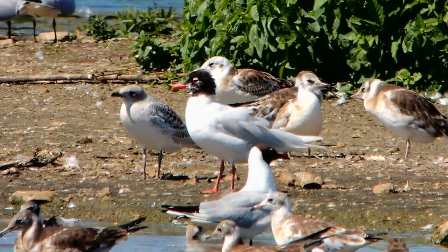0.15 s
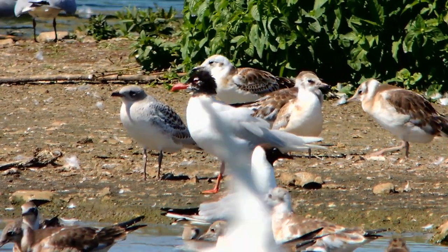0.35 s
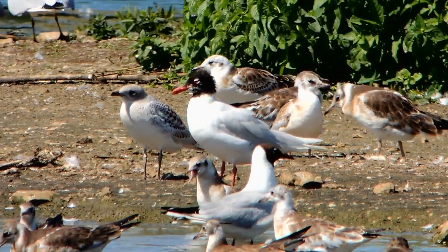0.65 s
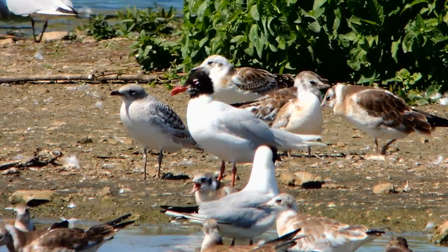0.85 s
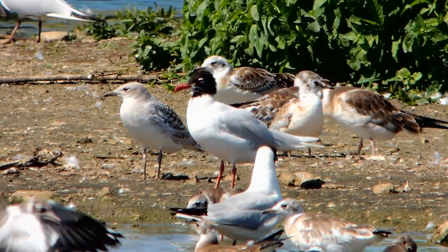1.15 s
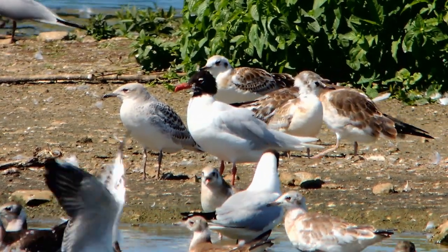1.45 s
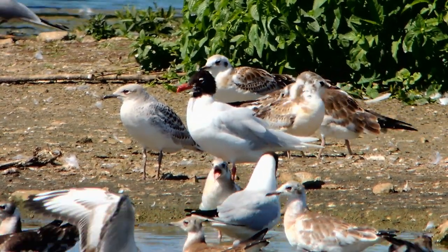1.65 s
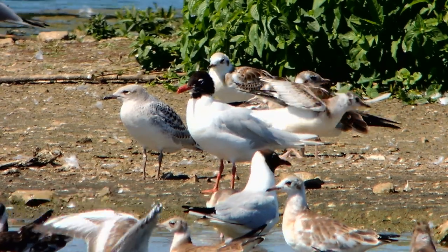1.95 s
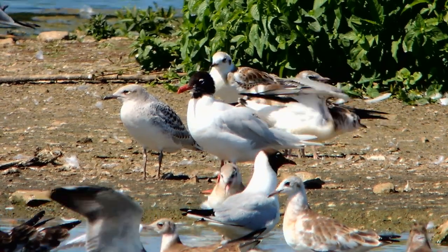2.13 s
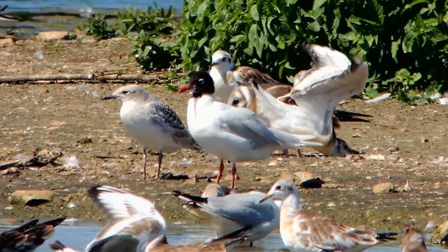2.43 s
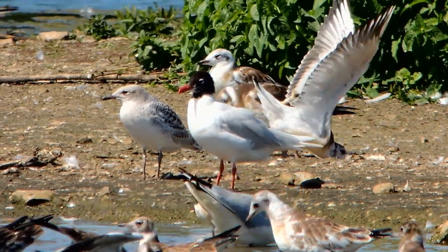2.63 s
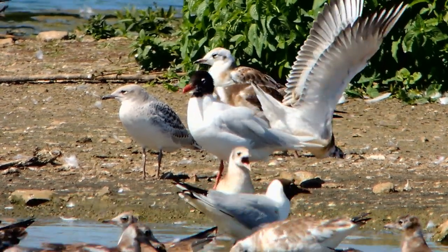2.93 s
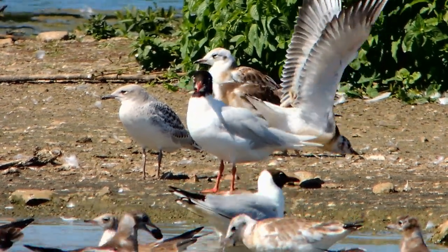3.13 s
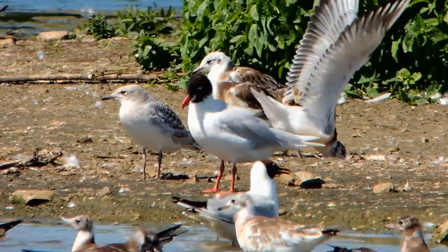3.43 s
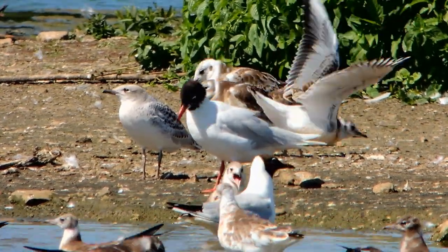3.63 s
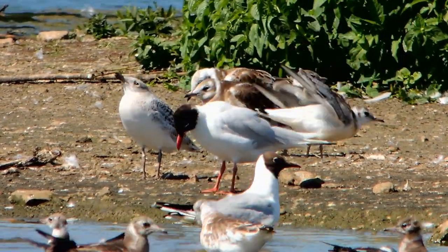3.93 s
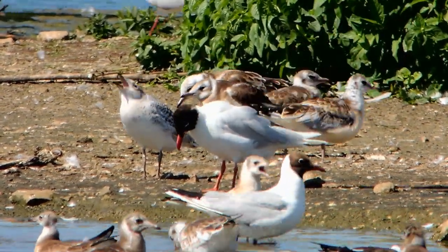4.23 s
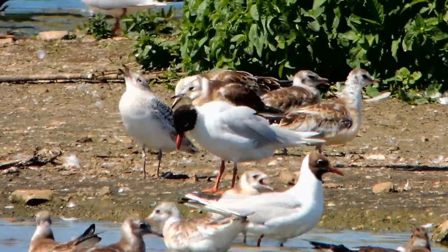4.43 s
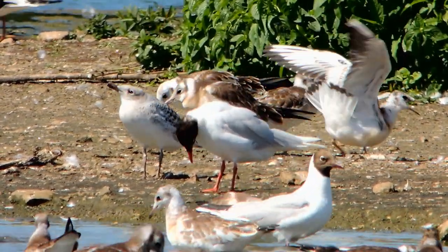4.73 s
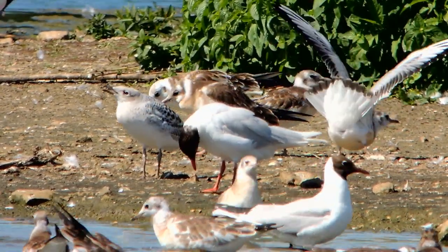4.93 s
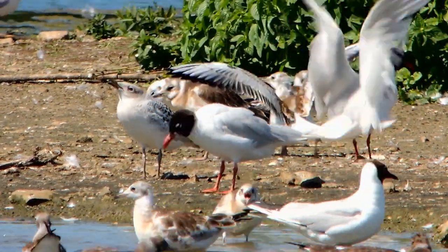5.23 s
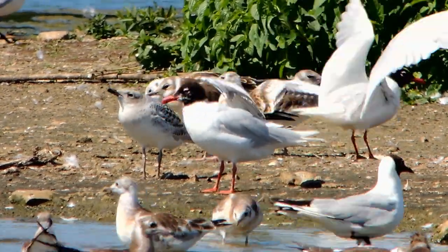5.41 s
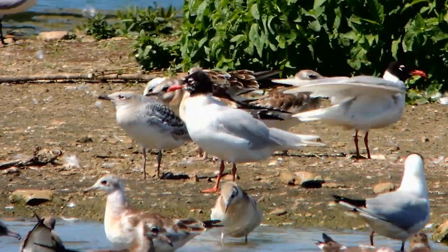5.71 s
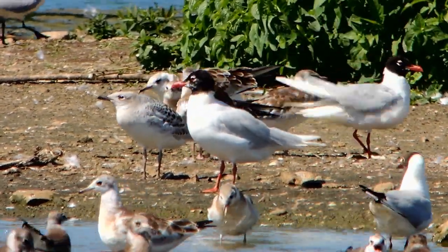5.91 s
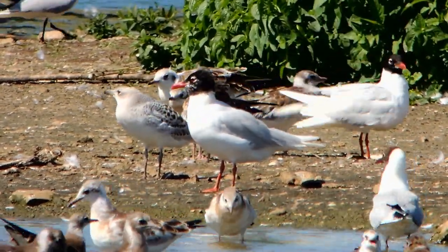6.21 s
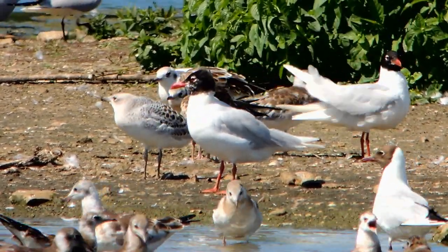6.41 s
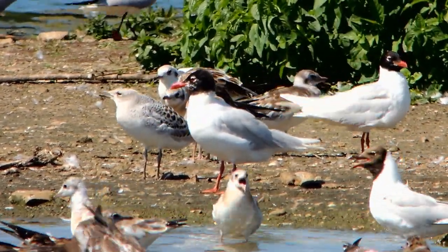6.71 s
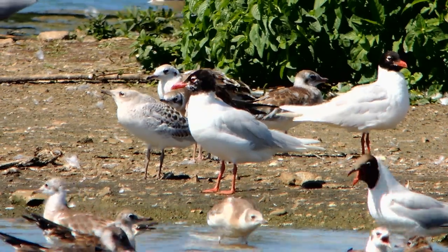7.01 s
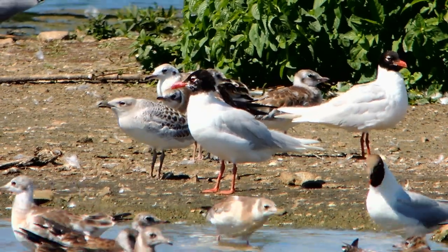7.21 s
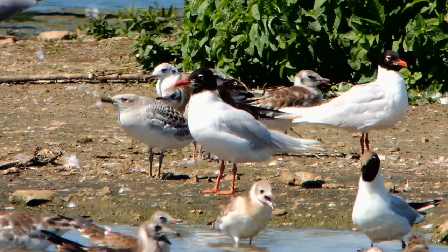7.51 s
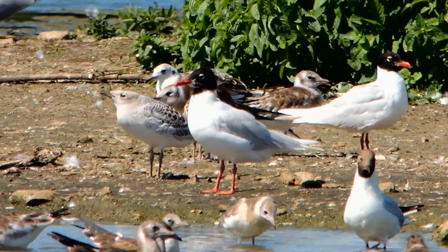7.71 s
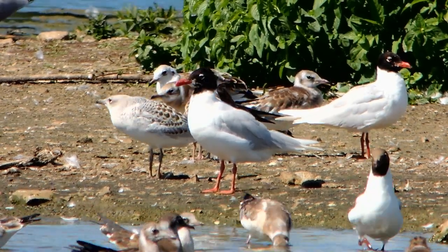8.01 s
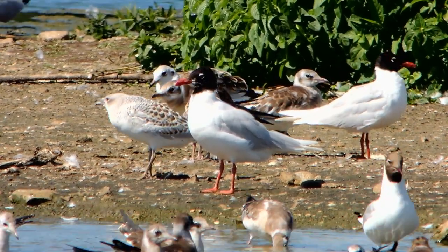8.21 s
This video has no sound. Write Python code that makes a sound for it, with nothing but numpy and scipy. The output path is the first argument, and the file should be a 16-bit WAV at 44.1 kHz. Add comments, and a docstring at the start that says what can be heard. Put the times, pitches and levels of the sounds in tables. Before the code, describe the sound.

Gulls scream hoarsely over a busy colony's din, while chicks peep and whistle shrilly close by.

```python
"""Nearby gulls scream in a shore colony: a hoarse harmonic buzz from the syrinx, chopped into throbs
by a second, slow vibration, rings throat and beak. A higher voice adds rattling screeches.
Chicks peep and whistle in near-pure tones that at times crack into rasps.
Far birds blend into a steady din over a low outdoor rumble; bank and bushes give a thin echo.
Once, something clicks sharply close by."""
import sys
import numpy as np
from scipy import signal
from scipy.fft import rfft, irfft, next_fast_len
from scipy.io import wavfile
from scipy.ndimage import map_coordinates

SR = 44100
rng = np.random.default_rng(int(sys.argv[2]) if len(sys.argv) > 2 else 0)


def output_pcm(signal):
    """Save a mono or channel-first signal as 16-bit PCM at the path in sys.argv[1].

    Samples are clipped to [-1, 1] before scaling.
    """
    pcm = np.clip(np.atleast_2d(signal).T, -1, 1) * 32767
    wavfile.write(sys.argv[1], SR, np.round(pcm).astype(np.int16))


N = 368215

# open-air rumble shape: (frequency [Hz], gain [dB])
RUMBLE_SPECTRUM = [(15, -7.5), (28, 1), (42, -4), (62, 4), (80, -7.5), (110, -6), (160, -14.5), (230, -35),
                   (400, -39)]
# rumble envelope: (time [s], relative level [dB])
RUMBLE_ENVELOPE = [(0, -47.5), (1.6, -50.5), (3.2, -51), (4.6, -47), (6.1, -47.5), (8.35, -46)]
# merged far colony: (frequency [Hz], gain [dB])
DIN_SPECTRUM = [(120, -15), (200, -5.5), (416, -7.5), (683, -4), (883, 1), (1320, -5), (1980, -1),
                (2470, -10.5), (3430, -13), (4270, -11.5), (7010, -26.5), (11500, -32), (13600, -96),
                (14900, -69), (16000, -62)]
# far gull timbre: (frequency [Hz], gain [dB])
FAR_GULL_SPECTRUM = [(500, -27), (880, -1.5), (1250, -9.5), (1600, 1.5), (2000, 8.5), (2600, -3.5),
                     (3300, 1), (4300, 1), (5500, -9), (9000, -30)]
# scattered echo decay: (frequency [Hz], T60 [s])
ECHO_T60 = [(300, 0.27), (2000, 0.28), (10000, 0.064)]
# stereo side filter: (frequency [Hz], gain [dB])
SIDE_GAIN = [(25, -13), (100, -17.5), (250, -12), (600, -17), (2000, -19.5), (4500, -10.5), (7000, -4),
             (9500, -1), (12000, -0.5)]
# gliding notes: (start [s], end [s], first [Hz], middle [Hz], last [Hz], relative level [dB])
SLUR_NOTES = [(0.254, 0.373, 4330, 4480, 4410, -56), (0.271, 0.438, 4120, 4150, 3820, -53),
              (1.026, 1.272, 3140, 3510, 4270, -57), (1.065, 1.22, 4450, 4380, 4420, -57),
              (1.156, 1.506, 2124, 2062, 1942, -54.5), (1.458, 1.49, 2950, 2850, 2600, -43.5),
              (1.71, 1.837, 4330, 4700, 4660, -63), (1.818, 1.856, 4300, 4690, 4800, -56),
              (2.257, 2.637, 2095, 1964, 1830, -64), (2.28, 2.365, 4000, 3880, 3600, -65),
              (2.364, 2.41, 3160, 3450, 3950, -58), (2.407, 2.504, 5420, 5800, 6500, -61),
              (2.508, 2.637, 4800, 4900, 4860, -55), (2.623, 2.744, 4430, 4520, 4530, -54.5),
              (2.76, 2.954, 4550, 4560, 4530, -51), (2.76, 2.9, 3100, 3580, 3980, -68),
              (4.225, 4.28, 3120, 3110, 2960, -57), (4.843, 4.94, 4000, 4180, 4290, -59),
              (5.226, 5.29, 3560, 3620, 3500, -56), (5.29, 5.397, 4670, 4710, 4450, -54),
              (5.456, 5.586, 3570, 4130, 4500, -55), (5.666, 5.758, 3900, 4190, 4370, -61),
              (5.8, 5.964, 4200, 3850, 3540, -64), (6.333, 6.498, 3880, 4190, 3800, -63),
              (6.314, 6.458, 4320, 4940, 4500, -54.5), (6.469, 6.616, 4640, 4510, 4590, -54.5),
              (6.502, 6.537, 3590, 3800, 3920, -51), (6.562, 6.683, 3990, 3616, 3540, -48),
              (6.848, 6.89, 3500, 3720, 4370, -52.5), (7.307, 7.368, 3600, 4120, 4150, -53),
              (7.408, 7.457, 3950, 3800, 3750, -51), (7.502, 7.52, 3120, 3250, 3500, -49),
              (7.556, 7.717, 5000, 4200, 3950, -56), (7.942, 8.098, 4360, 4550, 4700, -54.5)]
# begging whistles: (start [s], end [s], level [dB], catch length [s])
WHISTLE_CALLS = [(1.818, 1.993, -49, 0.12), (5.08, 5.32, -52, 0.084), (5.74, 6.03, -52, 0.14)]
# closest chick's held notes: (start [s], end [s], pitch [Hz], level [dB])
HELD_NOTES = [(1.197, 1.353, 4270, -43), (1.353, 1.407, 4330, -42), (1.414, 1.496, 4190, -40.5),
              (2.434, 2.635, 4310, -51.5), (3.669, 3.974, 4264, -47.5)]
# presses on those notes: (middle [s], length [s], pitch [Hz], level [dB], roughness [ratio])
PRESSES = [(1.234, 0.046, 4120, -34, 0.0095), (1.279, .03, 4410, -40, 0.019),
           (1.31, .026, 4000, -35, 0.013), (1.327, 0.016, 4140, -35, .008),
           (1.387, 0.031, 4030, -36.5, 0.051), (1.479, 0.054, 3860, -41, 0.035),
           (2.49, .035, 4120, -43, .018), (2.617, .04, 3900, -49, .018), (3.69, .035, 4060, -43.5, 0.0099),
           (3.785, .036, 4090, -37.5, .009), (3.864, 0.025, 3760, -38, 0.016),
           (3.936, .03, 3980, -43.5, 0.025), (3.962, 0.03, 3600, -45, 0.025)]
# chick rasps: (start [s], end [s], pitch [Hz], level [dB])
CRACK_CALLS = [(1.374, 1.413, 1345, -49), (1.452, 1.488, 970, -49.5), (2.544, 2.579, 1045, -46),
               (3.842, 3.888, 1000, -50), (3.926, 3.966, 950, -48)]
# higher voice: (start [s], end [s], pitch [Hz], rattle [Hz], hoarseness [0-1], level [dB])
SCREECH_CALLS = [(1.56, 1.72, 1080, 61.5, .45, -52), (2.93, 3.13, 1012, 60.9, .28, -46.5),
                 (3.346, 3.559, 1085, 65.5, .68, -37.5)]
# screech timbre: (frequency [Hz], gain [dB])
SCREECH_SPECTRUM = [(1200, -30), (2100, -4), (2700, 1.5), (3250, -1), (4250, 2), (5400, -4), (6600, -6.5),
                    (7400, -24), (10300, -21), (13000, -30), (16000, -45)]
# near gull throat: (frequency [Hz], gain [dB])
THROAT_SPECTRUM = [(600, -41), (1150, -53), (1500, 11), (1850, 13), (2080, 7.5), (2400, 7), (2750, 1.5),
                   (3300, -21), (5000, -62)]
# high overtones of screams and cracks: (frequency [Hz], gain [dB])
EDGE_SPECTRUM = [(3500, -56), (5200, 4), (6400, 4), (7400, 0.5), (8500, -2.5), (10500, -2.5), (13000, -8),
                 (16000, -30)]
# near gulls: (start [s], end [s], pitch [Hz], throb [Hz], strain [0-1], arch [ratio], fall [ratio],
# beak resonance [Hz], upper ring [Hz], relative throat [dB], relative nasal cry [dB], relative beak [dB])
SCREAM_CALLS = [(0.086, 0.305, 708, 93, 0.59, 0.11, -0.031, 4400, 7000, -50.5, -58, -59),
                (0.361, 0.767, 648, 63.4, 0.64, 0.12, 0.037, 4000, 5540, -50, -50, -50.5),
                (0.728, 1.119, 674, 45.6, 0.37, 0.1, .06, 4520, 5700, -52.5, -49.5, -53.5),
                (1.749, 2.008, 679, 95.3, 0.53, 0.096, -0.012, 4450, 6960, -56, -46.5, -66),
                (1.887, 2.263, 701.4, 52.7, 0.74, .08, 0.0056, 4430, 8700, -49.5, -62, -48),
                (2.591, 2.846, 702, 113.2, .58, 0.1, 0.019, 4230, 7300, -60, -45.5, -55),
                (3.068, 3.33, 665, 48.7, 0.94, 0.16, 0.022, 4250, 5700, -49.5, -50, -49),
                (3.567, 3.862, 693.5, 90, 0.73, 0.059, 0.0017, 4650, 7900, -55.5, -50, -57.5),
                (3.768, 4.038, 670, 50.2, 0.74, 0.099, 0.049, 4350, 5550, -49, -58, -52),
                (4.433, 4.704, 652.4, 55.6, 0.9, .15, 0, 4430, 7900, -48, -59, -50.5),
                (4.667, 4.897, 708, 126.7, 0.76, 0.14, 0.032, 4760, 7760, -52, -45.5, -55.5),
                (5.288, 5.551, 647, 49.4, 0.49, 0.11, 0.022, 4450, 6800, -57, -50.5, -56),
                (5.568, 5.827, 679, 120.7, 0.51, .14, 0.034, 4850, 7240, -52, -50.5, -56),
                (5.879, 6.159, 649, 60.7, 0.66, .08, 0.022, 4800, 5600, -54.5, -55.5, -63),
                (6.18, 6.355, 644, 90, 0, 0.093, .03, 3780, 5600, -53.5, -54, -66),
                (6.603, 6.813, 652, 79.7, .62, 0.037, 0.0056, 4500, 7500, -53.5, -51, -55),
                (6.847, 7.07, 665, 86, 0.67, 0.076, 0.0078, 4500, 5900, -58, -63, -51.5),
                (7.159, 7.497, 660, 104.1, .77, 0.092, 0.056, 4500, 7100, -57.5, -48, -51.5),
                (7.357, 7.72, 666, 70.1, 0.68, 0.13, 0.077, 4630, 6500, -56, -59, -50),
                (7.959, 8.129, 739, 110.5, .64, 0.063, 0.09, 4300, 7000, -75, -45.5, -52.5),
                (8.037, 8.374, 615.4, 86.3, 0.69, 0.077, 0.036, 4240, 6650, -54, -59, -47.5)]


def amp(db):
    return 10 ** (np.asarray(db) / 20)


def unit(x):
    return x / np.sqrt(np.mean(x ** 2) + 1e-20)


def along(points, hz):
    """Interpolate (Hz, value) points on a log axis."""
    knots_hz, values = np.transpose(points)
    return np.interp(np.log(hz + 1), np.log(knots_hz + 1), values)


def wobble(n, rate_hz):
    """Smooth random curve, rate_hz knots a second."""
    knots = rng.standard_normal(int(n * rate_hz / SR) + 4)
    return map_coordinates(knots, [np.arange(n) * rate_hz / SR])


def filtered(x, response):
    """Apply response(hz) by FFT."""
    n = x.shape[-1]
    size = next_fast_len(n + 2048)
    return irfft(rfft(x, size) * response(np.fft.rfftfreq(size, 1 / SR)), size)[..., :n]


def coloured(x, spectrum):
    """Filter by a (Hz, dB) table; rms 1."""
    return unit(filtered(x, lambda hz: amp(along(spectrum, hz))))


def formant(x, centre_hz, width_hz):
    """Steep-sided resonance; rms 1."""
    return unit(filtered(x, lambda hz: (1 + ((hz - centre_hz) / width_hz) ** 2 / 2) ** -2))


def sweep(x, centre_hz, width_hz):
    """Moving resonance: shift to 0 Hz, low-pass, shift back; rms 1."""
    carrier = np.exp(2j * np.pi * np.cumsum(centre_hz) / SR)
    base = x / carrier
    re, im = filtered(np.array([base.real, base.imag]), lambda hz: (1 + (hz / width_hz) ** 2 / 2) ** -2)
    return unit(((re + 1j * im) * carrier).real)


def fade(n, ramp_s):
    """Gate with soft ends."""
    t = np.arange(n) / SR
    return np.sin(np.pi / 2 * np.clip(np.minimum(t, t[-1] - t) / ramp_s, 0, 1))


def add(track, start_s, sound):
    """Mix in at start_s, cropped to the track."""
    i = round(start_s * SR)
    part = sound[max(-i, 0):max(N - i, 0)]
    track[max(i, 0):max(i, 0) + len(part)] += part


def course(length_s):
    """Progress u through a call, -1 to 1."""
    return np.linspace(-1, 1, max(int(length_s * SR), SR // 50))


def bend(u, arch, fall):
    """Relative pitch change: arch, fall and slight wander."""
    return arch * (1 / 3 - u ** 2) - fall * u + 0.00911 * wobble(len(u), 29.96)


def syrinx(pitch_hz, throb_hz, depth, hoarse):
    """Harmonic buzz; a second, slow vibration chops it into throbs and swings its pitch."""
    n = len(pitch_hz)
    beat = 2 * np.pi * np.cumsum(throb_hz * (1 + 0.059 * wobble(n, 45.4))) / SR
    jitter = 0.038 * hoarse * wobble(n, 600)
    hz = pitch_hz * (1 + 0.029 * depth * np.cos(beat) + jitter)
    phase = 2 * np.pi * np.cumsum(hz) / SR
    buzz = unit(np.sin(17.5 * phase) / np.sin(phase / 2) - 1)  # 17 equal harmonics
    # hoarseness: uneven pulses, each with a puff of air
    buzz *= 1 + 0.71 * hoarse * wobble(n, pitch_hz.mean())
    air = 0.9 * hoarse * rng.standard_normal(n) * (1 + np.cos(phase))
    throb = np.abs(np.cos(beat / 2)) ** 0.89
    return (buzz + air) * (1 - np.clip(depth, 0, 1) * (1 - throb))


def smeared(x):
    """Highs lag lows, 3.5 ms at 6 kHz, softening each voice pulse."""
    return filtered(x, lambda hz: np.exp(-1j * np.pi * 0.0035 * hz ** 2 / 6000))


def chick_note(hz, rough, overtone_db, octave_db):
    """The beak picks out the third harmonic, at hz; roughness shakes pitch and level."""
    n = len(hz)
    shake = rough * wobble(n, 376.5)
    phase = 2 * np.pi * np.cumsum(hz * (1 + shake + 0.00505 * wobble(n, 45.15))) / SR
    overtones = np.sin(4 / 3 * phase) + 0.12 * np.sin(5 / 3 * phase) + 0.08 * np.sin(3 * phase)
    tone = np.sin(phase) + amp(overtone_db) * overtones + amp(octave_db) * np.sin(2 * phase)
    return unit(tone * amp(157 * rough * wobble(n, 219)))


def slur(length_s, first_hz, middle_hz, last_hz, swell_db=2.5):
    """One note gliding through three pitches, loudest midway."""
    u = course(length_s)
    hz = np.polyval(np.polyfit([-1, 0, 1], [first_hz, middle_hz, last_hz], 2), u)
    note = chick_note(hz, rough=0.005, overtone_db=-36, octave_db=-23)
    return note * amp(swell_db * (1 / 2 - u ** 2)) * fade(len(u), 0.0052)


def echo(x):
    """Scatter from bank and bushes: a noise tail whose treble dies first."""
    hz, t, noise = signal.stft(rng.standard_normal(SR // 2), SR, nperseg=256)
    decay = amp(-60 * t / along(ECHO_T60, hz)[:, None])
    tail = signal.istft(noise * decay, SR, nperseg=256)[1]
    return signal.fftconvolve(x, tail / np.linalg.norm(tail))[:N]


def din(fall_db_per_s=0.26):
    """The farthest voices merge into a slowly settling roar over open-air rumble."""
    t = np.arange(N) / SR
    roar_db = -44 - fall_db_per_s * t + 0.071 * wobble(N, 18)
    roar = amp(roar_db) * coloured(rng.standard_normal(N), DIN_SPECTRUM)
    rumble_db = np.interp(t, *np.transpose(RUMBLE_ENVELOPE))
    return roar + amp(rumble_db) * coloured(rng.standard_normal(N), RUMBLE_SPECTRUM)


def far_birds(count=44):
    """Distant gulls scream at random, with two gliding chick notes per scream."""
    adults, young = np.zeros(N), np.zeros(N)
    starts_s = (np.arange(count) + rng.random(count)) / count * (N / SR + 0.3) - 0.3
    for start_s, (length, pitch, throb, size) in zip(starts_s, rng.uniform(-1, 1, (count, 4))):
        drift = bend(course(0.38 + 0.14 * length), arch=0.14, fall=0.04)
        call = syrinx((780 + 220 * pitch) * (1 + drift), 85 + 35 * throb, depth=0.46, hoarse=0.498)
        add(adults, start_s, amp(3 * size) * call * fade(len(call), 0.14))
        for delay, span, height, arch, direction, loudness in rng.uniform(-1, 1, (2, 6)):
            hz = 4500 - 280 * (height + 1) ** 2  # most near the top of the range
            glide_hz = 330 * np.sign(direction)
            note = slur(0.13 + 0.085 * span, hz - glide_hz, hz + 200 * abs(arch), hz + glide_hz)
            add(young, start_s + delay / 10, amp(2 * loudness) * (hz / 4000) * note)
    return amp(-56.5) * coloured(adults, FAR_GULL_SPECTRUM) + amp(-63.5) * unit(young)


def click(start_s=6.9887):
    """Hard tick and short knock, then a fizz that differs left and right."""
    t = np.arange(SR // 8) / SR
    knock = amp(-19) * np.sin(2 * np.pi * 1550 * t) * amp(-60 * t / 0.008)
    tick = amp(-28) * formant(rng.standard_normal(len(t)), 10000, 6000) * amp(-60 * t / 0.003)
    decay = amp(-60 * t / 0.059) + amp(-18 - 60 * t / 0.32)
    fizz_mid = amp(-32) * decay * formant(rng.standard_normal(len(t)), 10500, 4400)
    fizz_side = amp(-30) * decay * formant(rng.standard_normal(len(t)), 10500, 4400)
    out = np.zeros((2, N))
    add(out[0], start_s, knock + tick + fizz_mid + fizz_side)
    add(out[1], start_s, knock + tick + amp(1) * (fizz_mid - fizz_side))
    return out


def slurs():
    """Short gliding chick notes and a few lower cries."""
    out = np.zeros(N)
    for start_s, end_s, *pitches_hz, db in SLUR_NOTES:
        add(out, start_s, amp(db + 1.5) * slur(end_s - start_s, *pitches_hz))
    return out


def whistles(top_hz=4980, arch_hz=542, catch_hz=4610, catch_db=1, catch_after_s=0.04, jump_s=0.0055):
    """Arched begging whistles; each catches on a flat, louder note, then jumps back."""
    out = np.zeros(N)
    for start_s, end_s, db, catch_s in WHISTLE_CALLS:
        t = np.arange(0, end_s - start_s, 1 / SR) - catch_after_s
        free_hz = top_hz - arch_hz * np.linspace(-1, 1, len(t)) ** 2
        caught = np.clip(np.minimum(t, catch_s - t) / jump_s, 0, 1)
        hz = free_hz + caught * (catch_hz - free_hz)
        note = chick_note(hz, rough=0.0046, overtone_db=-30, octave_db=-30)
        add(out, start_s, amp(db + catch_db * caught) * note * fade(len(t), 0.015))
    return out


def peeps(held_rough=0.012):
    """The closest chick holds a thin note; each press shifts its pitch, level and roughness."""
    out = np.zeros(N)
    for start_s, end_s, hz, db in HELD_NOTES:
        t = np.arange(start_s, end_s, 1 / SR)
        rough = held_rough
        for middle_s, length_s, press_hz, press_db, press_rough in PRESSES:
            press = np.exp(-np.abs(2 * (t - middle_s) / length_s) ** 3)
            hz += press * (press_hz - hz)
            db += press * (press_db - db)
            rough += press * (press_rough - rough)
        note = chick_note(hz, rough, overtone_db=-19, octave_db=-26)
        add(out, start_s, amp(db) * note * fade(len(t), 0.004))
    return out


def cracks():
    """A chick's voice breaks into short, falling rasps."""
    out = np.zeros(N)
    for start_s, end_s, pitch_hz, db in CRACK_CALLS:
        drift = bend(course(end_s - start_s), arch=0, fall=0.0475)
        source = syrinx(pitch_hz * (1 + drift), throb_hz=110, depth=0.67, hoarse=0.52)
        crack = formant(source, 4100, 1040) + amp(-7.5) * coloured(source, EDGE_SPECTRUM)
        add(out, start_s, amp(db) * crack * fade(len(crack), 0.003))
    return out


def screeches(scoop_s=0.02, swell_db=10):
    """A higher voice scoops up to pitch and swells, cut into a hard rattle."""
    out = np.zeros(N)
    for start_s, end_s, pitch_hz, rattle_hz, hoarse, db in SCREECH_CALLS:
        u = course(end_s - start_s)
        scoop = 0.3 * np.exp(-np.arange(len(u)) / SR / scoop_s)
        hz = pitch_hz * (1 + bend(u, arch=0.025, fall=0.01) - scoop)
        source = smeared(syrinx(hz, rattle_hz, depth=0.88, hoarse=hoarse))
        voice = coloured(source, SCREECH_SPECTRUM)
        add(out, start_s, amp(db - swell_db * u ** 2) * voice * fade(len(u), 0.02))
    return out


def windpipe(x, spacing_hz):
    """Reflections along the windpipe ring at evenly spaced frequencies."""
    return filtered(x, lambda hz: 1 / (1 - 0.35 * np.exp(-2j * np.pi * hz / spacing_hz)))


def screams(throat_swell_db=5.5, beak_swell_db=9, edge_swell_db=11):
    """Near gulls: the syrinx rings throat and beak; resonances ride the pitch; mid-call is brightest."""
    out = np.zeros(N)
    for (start_s, end_s, pitch_hz, throb_hz, strain, arch, fall,
         beak_hz, ring_hz, throat_db, cry_db, beak_db) in SCREAM_CALLS:
        u = course(end_s - start_s)
        effort = 1 / 4 - u ** 2
        drift = bend(u, arch, fall)
        hz = pitch_hz * (1 + drift)
        gape = 1 + 0.57 * drift  # beak resonances partly follow the pitch
        hoarse = 0.42 + 0.16 * strain
        edge_db = -82.5 + 30 * strain
        source = smeared(syrinx(hz, throb_hz, depth=0.79 - 0.0013 * throb_hz, hoarse=hoarse))
        piped = windpipe(source, beak_hz / 4)  # beak stresses the fourth resonance
        # nasal cry: third harmonic, spread into a band by hoarseness
        cry = unit(sweep(source, 3 * hz, width_hz=370) * (1 + 1.4 * hoarse * wobble(len(u), 520)))
        throat = amp(throat_db + 2) * coloured(source, THROAT_SPECTRUM) + amp(cry_db - 2.5) * cry
        throat *= amp(throat_swell_db * effort)
        beak = amp(beak_db + beak_swell_db * effort) * sweep(piped, beak_hz * gape, width_hz=825)
        ring = sweep(source, ring_hz * gape, width_hz=830)
        overtones = amp(1) * coloured(piped, EDGE_SPECTRUM)
        edge = amp(edge_db + edge_swell_db * effort) * unit(ring + overtones)
        add(out, start_s, (throat + beak + edge) * fade(len(u), 0.03))
    return out


def scene():
    """Mid/side mix: calls centred; echo and din wide, most of all in the treble."""
    near = screams() + screeches() + peeps() + whistles() + cracks() + slurs()
    far = far_birds()
    mid = near + amp(-12) * echo(near) + amp(3.5) * far + amp(-1.5) * echo(far) + amp(-1) * din()
    diffuse = amp(-7.5) * echo(near) + echo(far) + din()
    side = filtered(diffuse, lambda hz: amp(along(SIDE_GAIN, hz)))
    return np.array([mid + side, mid - side]) + click()


def record(dry):
    """The top treble steps down, then cuts off."""
    shelf_hz, shelf_db, cutoff_hz = 14250, -24, 16400
    return filtered(dry, lambda hz: np.where(hz < shelf_hz, 1, amp(shelf_db)) * (hz < cutoff_hz))


dry = scene()
out = record(dry)
output_pcm(out)
```